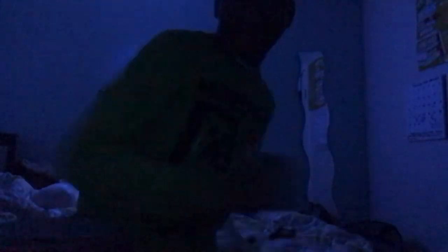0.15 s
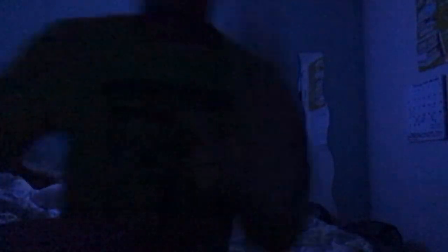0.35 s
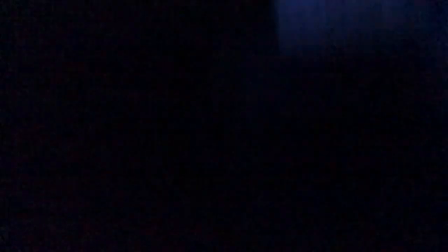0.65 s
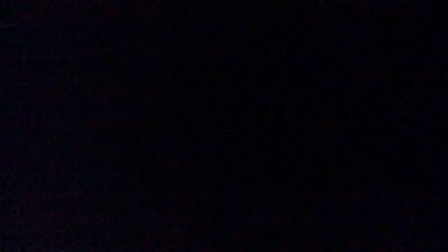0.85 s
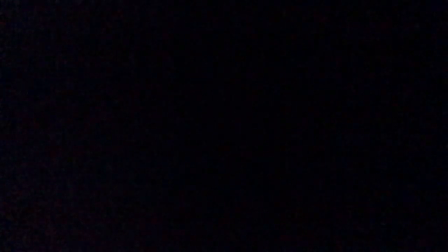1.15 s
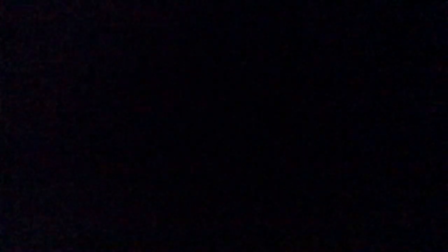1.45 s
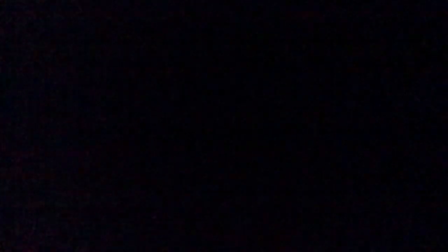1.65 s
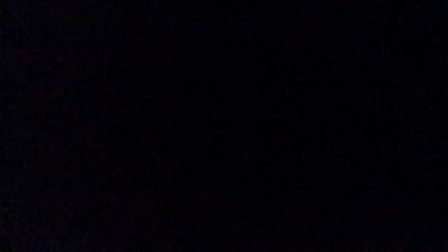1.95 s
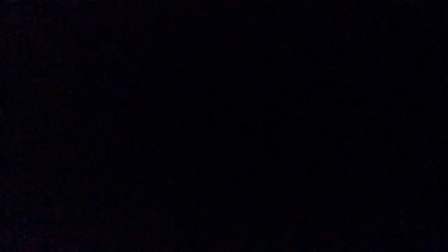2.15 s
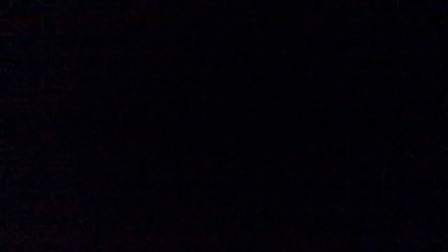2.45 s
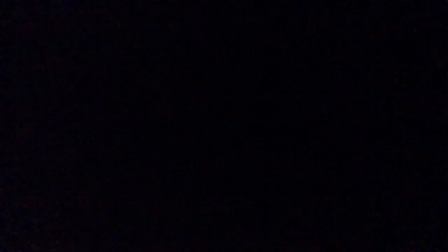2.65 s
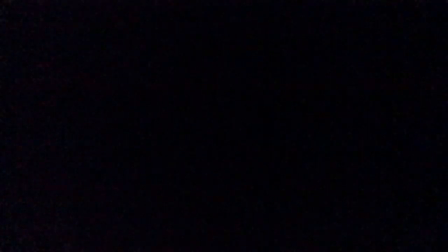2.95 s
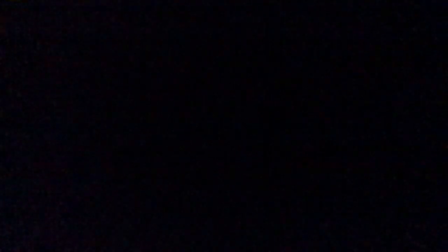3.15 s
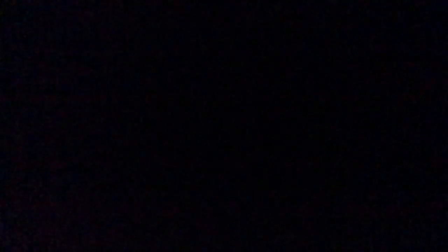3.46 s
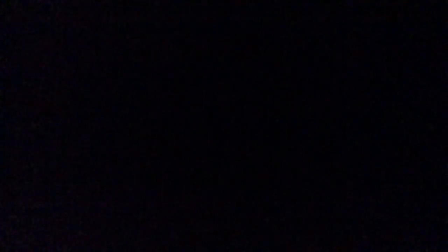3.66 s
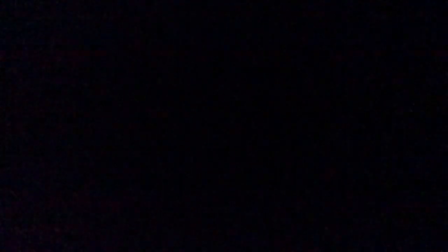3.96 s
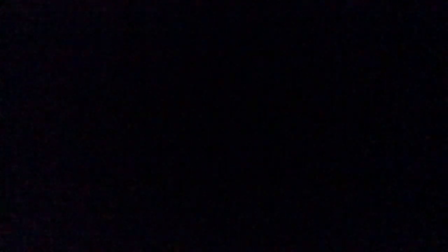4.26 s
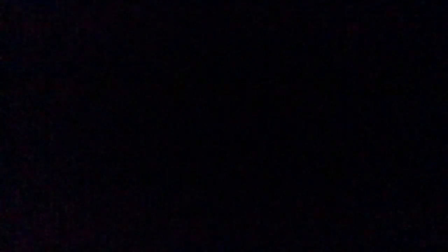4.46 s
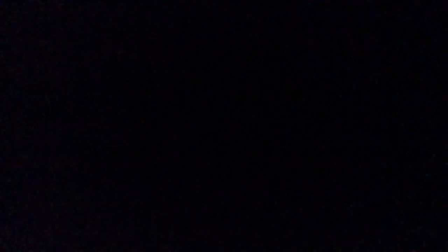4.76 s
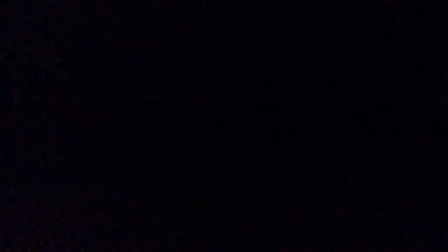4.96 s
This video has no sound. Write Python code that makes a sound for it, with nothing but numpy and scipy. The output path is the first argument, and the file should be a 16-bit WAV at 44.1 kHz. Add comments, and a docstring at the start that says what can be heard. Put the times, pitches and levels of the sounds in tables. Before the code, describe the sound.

Faint cloth handling, then a loud clattering crash of a thin plastic casing scraping down onto bedding, followed by sharp knocks and near silence.

```python
"""In a small bedroom a thin plastic casing with the microphone inside is grabbed, tips over and scrapes
down onto bedding; afterwards it is knocked and nudged while cloth slides over it.
Blows are clicks that ring the casing and cross its panel as bending waves, highs first and lows late.
Rattles and sliding are coloured random catches, rubs are noise in a narrow resonance.
Faint electronics whine and room noise lie underneath, made of filtered noise."""
import sys
import numpy as np
from scipy import signal
from scipy.fft import rfft, irfft, next_fast_len
from scipy.io import wavfile

SR = 44100
rng = np.random.default_rng(int(sys.argv[2]) if len(sys.argv) > 2 else 0)


def wav_out(sig):
    """Save sig, one row per channel (or a flat mono array), as 16-bit PCM at SR to the path in sys.argv[1]."""
    wavfile.write(sys.argv[1], SR, np.round(np.clip(np.atleast_2d(sig).T, -1, 1) * 32767).astype(np.int16))


N = 224643

# Every spectrum below gives only a tone colour: coloured() evens out its overall level.

# Colour of the room noise: pitch_hz, level_db (per Hz)
ROOM_COLOUR = [(18, -44.5), (30, -6), (107, 4.5), (378, -11.5), (592, -2), (658, -20), (1340, -21),
               (1570, -30), (2340, -26.5), (2810, -25.5), (3660, -25), (13000, -31.5), (16500, -49.5)]
ROOM_DB = -79.5
# Whines of electronics: pitch_hz, width_hz, level_db (before the growth below)
WHINES = [(579, 8.5, -79.5), (2350, 25, -86.5), (2490, 55, -97), (3650, 60, -94)]
# How the whine grows: time_s, level_db
WHINE_GROWTH = [(2.0, -9), (3.6, 0), (5.09, 2)]
# Level sinks in the room noise, whine and resting cloth: start_s, aim_s (when the fall would reach full depth),
# end_s (where the level jumps straight back), depth_db
QUIET_DIP = (0.6, 1.95, 1.2, 8)

# Echo of the room: a weak middle tail, and bright scatter from things close by
TAIL_T60_S, TAIL_DB = 0.33, -60.5
NEAR_T60_S, NEAR_DB = 0.09, -48

# Colour of the rumble of handling: pitch_hz, level_db (per Hz)
RUMBLE_COLOUR = [(18, -53.5), (30, -18), (59, -3), (123, 2.5), (204, -2), (253, -5), (424, -15.5),
                 (500, -11), (650, -36), (1100, -120)]
# Level of that rumble, around which it wavers: time_s, level_db
RUMBLE_LEVEL = [(0, -52.5), (.12, -52.5), (.22, -53.5), (.485, -52), (0.501, -17), (.63, -27.5), (.67, -13),
                (.705, -25), (.78, -29), (.9, -34), (1.05, -53.5), (1.109, -44.5), (1.19, -65.5),
                (1.41, -55), (1.5, -69), (1.76, -61), (1.9, -75.5), (2.3, -72), (2.45, -63.5),
                (2.95, -64.5), (3.38, -69.5), (3.65, -64), (4.1, -65), (4.35, -70), (5.09, -70)]
# Colour of the dull drag: pitch_hz, level_db (per Hz)
DRAG_COLOUR = [(180, -30), (300, 0.5), (551, -2), (646, -1.5), (905, -4.5), (1040, -9.5), (1300, -7.5),
               (1690, -40), (2860, -120)]
# Colour of the grainy scrape: pitch_hz, level_db (per Hz)
SCRAPE_COLOUR = [(650, -34), (1100, -3.5), (1330, -3.5), (1830, -1), (2140, -3.5), (2300, -3.5), (3170, -6),
                 (3780, -5), (5020, -14), (6000, -22.5), (7800, -51), (13200, -120)]
# Colour of the fine hiss of cloth: pitch_hz, level_db (per Hz)
CLOTH_COLOUR = [(2650, -33.5), (4500, -5), (7220, -9), (8970, -7), (10900, -12), (14500, -16.5),
                (16100, -20), (16500, -42.5)]
# Strokes of hands and cloth over the shell: start_s, rise_s, hold_s, fall_s, scrape_db,
# drag_db (over scrape), hiss_db (over scrape)
STROKES = [(0.0, 0.00073, 0.0054, 0.076, -57, 4.5, -8.5), (0.042, 0.0188, 0.06, 0.13, -66, 7, -2),
           (.135, 0.0173, 0.028, .06, -57.5, 0, -10.5), (0.166, .05, 0.0412, .1, -53.5, 4, -10.5),
           (0.241, 0.015, 0.0566, 0.09, -49.5, -4.5, -5.5), (0.322, 0.015, .03, 0.048, -46.5, -13, -6.5),
           (.37, .02, 0.15, .02, -59, -5, -7.5), (0.491, 0.0059, 0.0874, 0.12, -27, 4.5, -15),
           (0.623, 0.0459, 0.0359, 0.058, -18.5, -4.5, -14.5), (0.692, 0.045, .05, 0.07, -21, -3.5, -9.5),
           (0.783, 0.049, 0.0384, 0.1216, -26, 0.5, -18.5), (0.892, 0.031, 0.045, 0.15, -50.5, 11, -2),
           (1.079, 0.011, 0.13, 0.0876, -66, 8, -1.5), (1.238, 0.0846, 0.0643, 0.154, -68, -1, -4.5),
           (1.396, 0.0914, 0.19, .15, -66, -2, -4), (1.723, .004, 0.084, 0.012, -56, 5.5, -14),
           (2.02, 0.076, 0.11, 0.049, -78, -6, 0.5), (2.211, 0.1827, 0.074, 0.088, -68.5, -1, -1),
           (2.7, 0.053, .04, .06, -70.5, -1.5, -7.5), (2.843, .015, .07, .45, -69.5, -10, -1)]
SWELL_DB = 20  # rise and fall start and end this far under the hold
# Cloth lying on the shell, before the dip: drag_db, scrape_db, hiss_db
RESTING_CLOTH = (-78, -81, -85.5)

# Rubs that set one resonance singing: start_s, length_s, pitch_hz, width_hz, level_db
RUBS = [(0.0, 0.0486, 93, 22, -46), (0.156, 0.1706, 201, 43, -47), (0.225, 0.031, 1054, 150, -48.5),
        (1.111, 0.14, 466, 157, -52), (1.112, 0.11, 870, 120, -52.5), (1.128, 0.258, 2880, 550, -61),
        (1.208, 0.111, 135.3, 13, -51), (1.431, 0.176, 1520, 110, -69.5), (1.785, 0.12, 1989, 550, -74),
        (2.303, .25, 2020, 85, -73), (2.754, 0.33, 2050, 110, -74.5)]

# Rattles of loose parts and edges catching: time_s, peak_db (nominal), treble_db (over peak)
RATTLES = [(0.3434, -28.5, -24.5), (0.4948, -14, -21), (0.4994, -8, -31.5), (0.5147, -12.5, -19.5),
           (0.5374, 1, -30), (0.5414, 9, -39), (0.5493, -4.5, -17), (0.568, -9, -29.5),
           (0.5775, -9.5, -33.5), (0.605, -6, -28), (0.6351, -20, -19.5), (0.647, -11.5, -23),
           (0.6564, -10, -22), (0.6751, -11.5, -16.5), (0.6874, -7.5, -19.5), (0.6997, -8, -22),
           (0.7121, -4.5, -14), (0.74, -1.5, -22.5), (0.7496, -5.5, -27.5), (0.7703, -14.5, -8.5),
           (0.8005, -13.5, -24), (0.827, -25, -6), (0.8396, -2, -20), (0.8566, -18, -13),
           (0.8756, -22.5, -22.5), (0.9087, -19.5, -21), (0.9414, -9, -31.5), (0.9795, -32, -23.5),
           (1.0271, -11, -55.5), (1.081, -39, -1), (2.1959, -43.5, -27), (2.2477, -61, -3),
           (3.185, -61.5, -22.5), (3.2625, -63, -20.5), (4.3852, -57.5, -21.5), (4.4229, -61.5, -22),
           (4.5025, -58, -23)]
# Colour of the rattles' treble: pitch_hz, level_db (per Hz)
RATTLE_TREBLE = [(2650, -29), (4500, -8.5), (6000, -5.5), (9730, -7), (10900, -13.5), (14600, -15.5),
                 (16100, -25.5), (16500, -38)]
RATTLE_T60_S = 0.018

# Blows on the casing, before the gain of each part:
# time_s, strength_db, boom_db, thud_db, crack_db (these three over strength)
BLOWS = [(0.372, -53, 6.5, -2.5, -16), (0.499, -5, -5.5, -3, -10.5), (0.512, -14, -30.5, -3, -5),
         (0.581, -21, -16.5, 1, 3), (0.587, -5.5, -25.5, -5.5, -6.5), (0.607, -9, -13.5, -34.5, -13.5),
         (0.658, -8.5, -5.5, -4.5, -23), (0.67, -12, -19, -7, -23.5), (0.716, -3, -9, -5, -15),
         (0.742, -13.5, -14, -10.5, -3), (0.766, -4, -38, -21, -7.5), (0.837, -8.5, -18, -18, -3.5),
         (0.857, -28, -23, -3, -1), (0.899, -25, -24, -10, -20.5), (0.937, -17, -21, -7, -18),
         (0.959, -21.5, -36.5, -13.5, -26.5), (0.985, -26.5, -25, -9.5, -33), (1.075, -15, -32.5, -12, -23),
         (1.38, -55, -3, -6, -8.5), (1.754, -13.5, -15.5, 4, 3), (2.106, -67.5, -8, 0, -7.5),
         (2.199, -49.5, -21, -6, -14), (2.399, -64, -2, 5.5, -4), (2.919, -60, -4.5, -3.5, -4.5),
         (3.102, -43.5, -12, -8.5, -21.5), (3.18, -57.5, 2, -5, -13.5), (3.54, -55.5, -3, 5, -21),
         (3.648, -43, -10, -4.5, -26), (3.936, -50.5, -8, -1.5, -23.5), (4.049, -16.5, -16, -11, -18.5),
         (4.458, -46.5, -1.5, -4.5, -22)]
# Resonances that boom: pitch_hz, width_hz, level_db
BOOM_MODES = [(80, 61, -0.5), (126, 55, 2.5)]
# Resonances that thud: pitch_hz, width_hz, level_db
THUD_MODES = [(198.5, 55, 3), (287.04, 200, -4)]
# Resonances that knock: pitch_hz, width_hz, level_db
KNOCK_MODES = [(480, 140, 0), (610, 220, 2), (750, 75, 3.5), (944, 170, -5)]
# Resonances that crack: pitch_hz, width_hz, level_db
CRACK_MODES = [(1442, 530, -1), (2245, 380, 6.5), (2710, 290, 2)]
# Resonances that snap: pitch_hz, width_hz, level_db
SNAP_MODES = [(3220, 460, 1.5), (4740, 1500, -3)]
SNAP_DB, SNAP_FOLLOWS = -2.5, 1.15  # snap over knock; its share of the crack's excess over the knock
TOUCH_S, TOUCH_DB = 0.006, -20.5  # a soft first touch leads each blow
TOUCH_DULL_DB = 6.5  # treble lost by the touch, dB per octave above 500 Hz
REBOUND_S, REBOUND_DB = 0.002, -3.5  # second touch; the delay is varied by chance
BLOW_SPREAD_DB = 1.5  # chance in how strongly a blow feeds each resonance

LAG_S, LAG_POWER = 0.0075, 1.4  # delay of 100 Hz through the panel; how fast it shrinks with pitch
SHIFT_DB = 4.0  # contacts wander over the shell, so each resonance is fed more or less
CUTOFF_HZ = 16400


def from_db(db):
    """Turn decibels into a plain factor."""
    return 10 ** (np.asarray(db) / 20)


def rms_one(x):
    """Scale a sound to an average (rms) level of 1."""
    return x / np.sqrt(np.mean(x ** 2) + 1e-20)


def curve(points):
    """Join (time_s, value) points with straight lines over the whole scene."""
    return np.interp(np.arange(N) / SR, *np.transpose(points))


def band(x, low_hz, high_hz):
    """Keep the pitches between two limits."""
    sos = signal.butter(2, [low_hz, high_hz], "band", fs=SR, output="sos")
    return signal.sosfilt(sos, x + 1e-18)


def resonance(x, hz, width):
    """Ring at one pitch, with gain near 1 at its peak; a narrow width in Hz rings longer."""
    r = np.exp(-np.pi * width / SR)
    feedback = [1, -2 * r * np.cos(2 * np.pi * hz / SR), r * r]
    return signal.lfilter([(1 - r * r) / 2, 0, (r * r - 1) / 2], feedback, x + 1e-18)


def drift(rate_hz):
    """Wander slowly by chance, with rms 1."""
    r = np.exp(-2 * np.pi * rate_hz / SR)
    slow = signal.lfilter([1], [1, -2 * r, r * r], rng.standard_normal(N + SR))
    return rms_one(slow[SR:])  # skip the first second, while the filter settles


def coloured(x, spectrum):
    """Give an evenly coloured (white) signal the tone colour of a spectrum, at rms 1."""
    hz, level_db = np.transpose(spectrum)
    grid_hz = np.fft.rfftfreq(N, 1 / SR) + 1  # + 1 avoids the logarithm of zero
    gain_db = np.interp(np.log(grid_hz), np.log(hz), level_db, -90, -90)
    return rms_one(irfft(rfft(x) * from_db(gain_db), N))


def grains(per_s, spread_db):
    """Scatter tiny catches of uneven size and random sign over time."""
    size_db = spread_db * np.minimum(rng.exponential(1, N), 4)
    sizes = from_db(size_db) * rng.choice([-1, 1], N)
    return sizes * (rng.random(N) < per_s / SR)


def clicks(times, level_db):
    """Place one-sample clicks at the given times in seconds."""
    out = np.zeros(N)
    out[np.round(np.asarray(times) * SR).astype(int)] = from_db(level_db)
    return out


def panel(x):
    """Bending waves run slower the lower they are: a click becomes a falling chirp."""
    size = next_fast_len(N + SR // 2)
    hz = np.maximum(np.fft.rfftfreq(size, 1 / SR), 60)
    delay_s = LAG_S * (100 / hz) ** LAG_POWER
    phase = 2 * np.pi * np.cumsum(delay_s) * SR / size  # adding up delay over pitch gives phase
    return irfft(rfft(x, size) * np.exp(-1j * phase), size)[:N]


def quiet_db():
    """Sink slowly toward the full depth, then jump back at the end time; shared by the room noise, whine and
    resting cloth."""
    *times, depth_db = QUIET_DIP
    return np.interp(np.arange(N) / SR, times, [0, -depth_db, 0])


def background():
    """Room noise is coloured noise; electronics whines are noise through narrow resonances, wavering."""
    white = rng.standard_normal(N)
    whine = np.zeros(N)
    for hz, width, db in WHINES:
        tone = resonance(resonance(white, hz, width), hz, width)
        whine += from_db(db + 1.5 * drift(3.7)) * rms_one(tone)
    whine *= from_db(curve(WHINE_GROWTH))
    room = from_db(ROOM_DB) * coloured(rng.standard_normal(N), ROOM_COLOUR)
    return from_db(quiet_db()) * (room + whine)


def bedroom(x):
    """A weak diffuse tail in the middle register and a short bright scatter; bedding swallows the rest."""
    t = np.arange(SR // 2) / SR
    white = rng.standard_normal((2, len(t)))
    # each falls by 60 dB in its T60 time
    far = rms_one(band(white[0], 640, 2600)) * from_db(TAIL_DB - 60 * t / TAIL_T60_S)
    near = rms_one(band(white[1], 720, 6200)) * from_db(NEAR_DB - 60 * t / NEAR_T60_S)
    echo = (far + near) * np.minimum(t / 0.002, 1)
    return signal.fftconvolve(x, echo)[:N]


def stroke_levels():
    """Drag, scrape and hiss in dB: each stroke rises, holds and falls, its power added to resting cloth."""
    t = np.arange(N) / SR
    # twice the decibels turns a level into power
    power = from_db(2 * (np.array(RESTING_CLOTH)[:, None] + quiet_db()))
    for start, rise, hold, fall, scrape_db, drag_db, hiss_db in STROKES:
        top = start + max(rise, 0.001)
        before_hold = (top - t) / (top - start)
        after_hold = (t - top - hold) / max(fall, 0.01)
        under_db = SWELL_DB * np.maximum(before_hold, after_hold).clip(0, 6)
        layers_db = scrape_db + np.array([[drag_db], [0], [hiss_db]])
        power = power + from_db(2 * (layers_db - under_db))
    return 10 * np.log10(power)


def sliding():
    """Cloth and hands drag over the shell in tiny catches: lumpy rumble, dull drag, scrape, fine hiss."""
    drag_db, scrape_db, hiss_db = stroke_levels()
    # a hard grip catches and lets go, light cloth glides
    catch_db = drift(35) * np.interp(scrape_db, [-65, -30], [0.8, 4.5])

    rumble = panel(coloured(grains(250, 3.0), RUMBLE_COLOUR))
    rumble *= from_db(curve(RUMBLE_LEVEL) + 2.5 * drift(12))

    drag = coloured(grains(1200, 3.0), DRAG_COLOUR) * from_db(drag_db + 0.89 * catch_db)

    rough = coloured(grains(4600, 2.2), SCRAPE_COLOUR)
    ringing = np.zeros(N)
    for hz, width, _ in CRACK_MODES + SNAP_MODES:
        ringing += from_db(SHIFT_DB * drift(30)) * resonance(rough, hz, width)
    scrape = rms_one(rough + 1.5 * ringing) * from_db(scrape_db + catch_db)

    hiss = coloured(rng.standard_normal(N), CLOTH_COLOUR) * from_db(hiss_db + 1.3 * catch_db)
    return rumble + drag + scrape + hiss


def rubs():
    """Soft swells of noise, each through one narrow resonance."""
    out, white = np.zeros(N), rng.standard_normal(N)
    for start, length, hz, width, db in RUBS:
        at, size = max(round(start * SR), 0), round(length * SR)
        noise = white[at:at + size]
        sung = rms_one(resonance(resonance(noise, hz, width), hz, width))
        out[at:at + size] += from_db(db) * np.sqrt(np.hanning(size)) * sung
    return out


def rattles():
    """Bursts of dense contacts that die within milliseconds, ringing the shell."""
    contacts = grains(9000, 3.0)
    shell = np.zeros(N)
    for k, (hz, width, db) in enumerate(CRACK_MODES + SNAP_MODES):
        feed = from_db(db + SHIFT_DB * drift(24))
        shell += (-1) ** k * feed * resonance(contacts, hz, width)
    body = rms_one(band(shell, 630, 6500))
    treble = coloured(contacts, RATTLE_TREBLE)

    out, t = np.zeros(N), np.arange(SR // 8) / SR
    fade = np.minimum(t / 0.001, 1) * from_db(-60 * t / RATTLE_T60_S)
    for start, peak_db, treble_db in RATTLES:
        at = round(start * SR)
        span = slice(at, at + len(t))
        body_part = from_db(peak_db - 7) * body[span]
        treble_part = from_db(peak_db + treble_db + 5) * treble[span]
        out[span] += fade * (body_part + treble_part)
    return out


def struck(modes, times, level_db):
    """Each blow touches lightly, strikes every resonance by its own chance strength and rebounds once."""
    chance_db = rng.normal(0, BLOW_SPREAD_DB, (len(times), len(modes)))
    rebound_times = times + REBOUND_S * rng.uniform(0.43, 1.5, len(times))
    out = np.zeros(N)
    for k, (hz, width, db) in enumerate(modes):
        dull_db = TOUCH_DULL_DB * max(np.log2(hz / 500), 0)
        strength_db = level_db + db + chance_db[:, k]
        touch = clicks(times - TOUCH_S, strength_db + TOUCH_DB - dull_db)
        strike = clicks(times, strength_db)
        rebound = clicks(rebound_times, strength_db + REBOUND_DB - 0.27 * dull_db)
        # neighbouring resonances alternate in sign
        out += (-1) ** k * resonance(touch + strike + rebound, hz, width)
    return out


def blows():
    """Each blow booms, thuds, knocks, cracks and snaps as resonances of the casing, through the panel."""
    times, knock_db, boom_db, thud_db, crack_db = np.transpose(BLOWS)
    snap_db = SNAP_DB + SNAP_FOLLOWS * crack_db
    boom = from_db(50.5) * band(struck(BOOM_MODES, times, knock_db + boom_db), 40, 160)
    thud = from_db(46.5) * band(struck(THUD_MODES, times, knock_db + thud_db), 110, 500)
    knock = from_db(28.0) * band(struck(KNOCK_MODES, times, knock_db), 450, 1500)
    crack = from_db(27.5) * band(struck(CRACK_MODES, times, knock_db + crack_db), 780, 2900)
    snap = from_db(23.0) * band(struck(SNAP_MODES, times, knock_db + snap_db), 2500, 8700)
    return panel(boom + thud + knock + crack + snap)


def scene():
    """Add all the sources; only blows and rattles are echoed by the bedroom."""
    hits = blows() + rattles()
    mix = background() + bedroom(hits) + sliding() + rubs() + hits
    return mix[None]


def record(dry):
    """The small microphone drops the deep bass, peaks are rounded, the top is cut."""
    high_pass = signal.butter(4, 50, "high", fs=SR, output="sos")
    thin = signal.sosfilt(high_pass, dry)
    rounded = 0.97 * np.tanh(thin / 0.86)
    low_pass = signal.cheby2(12, 60, CUTOFF_HZ, fs=SR, output="sos")
    return signal.sosfilt(low_pass, rounded)


dry = scene()
out = record(dry)
wav_out(out)
```